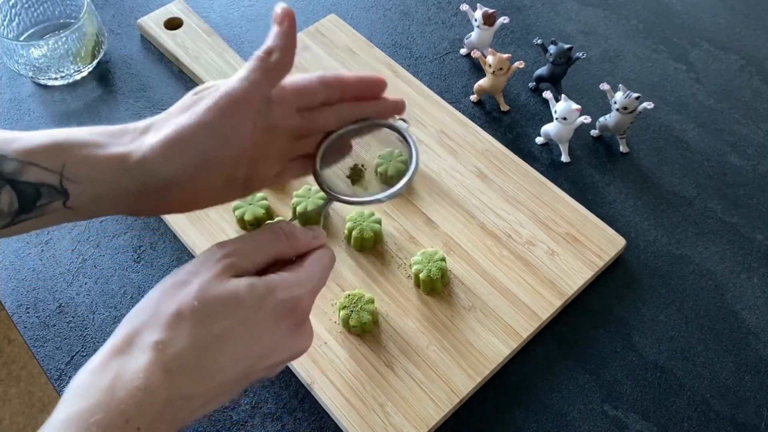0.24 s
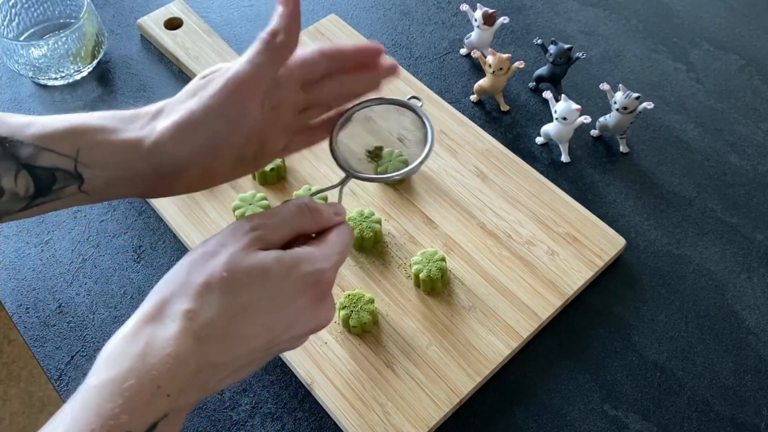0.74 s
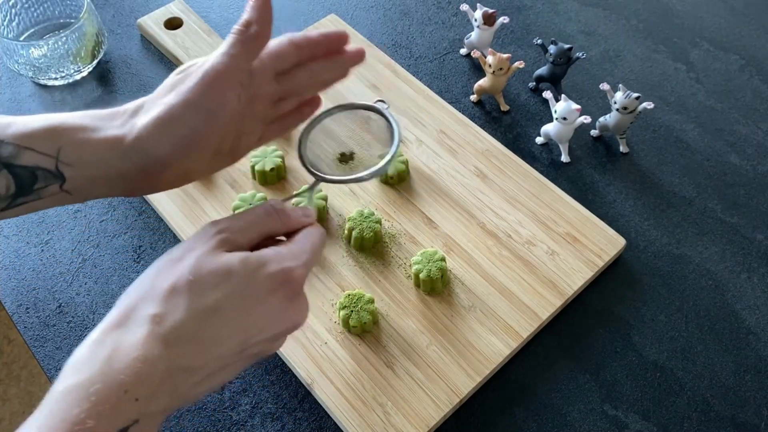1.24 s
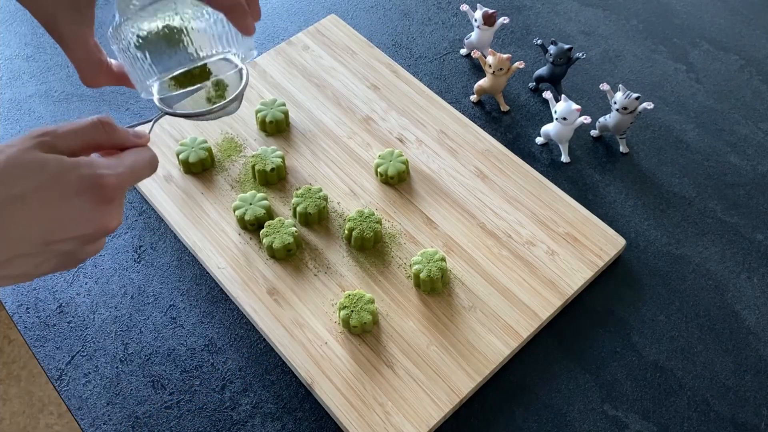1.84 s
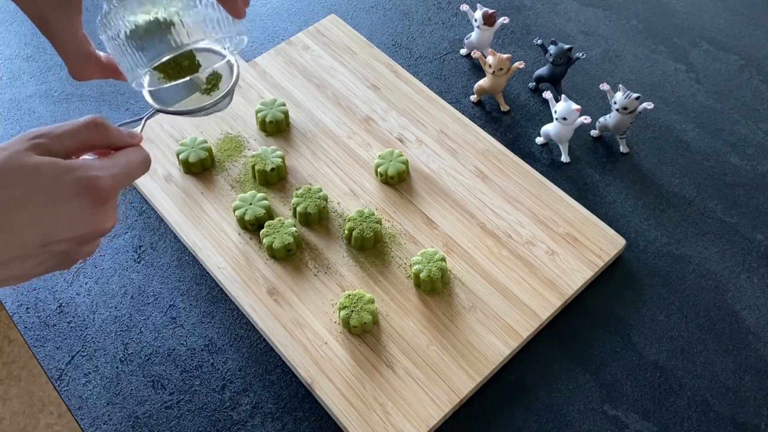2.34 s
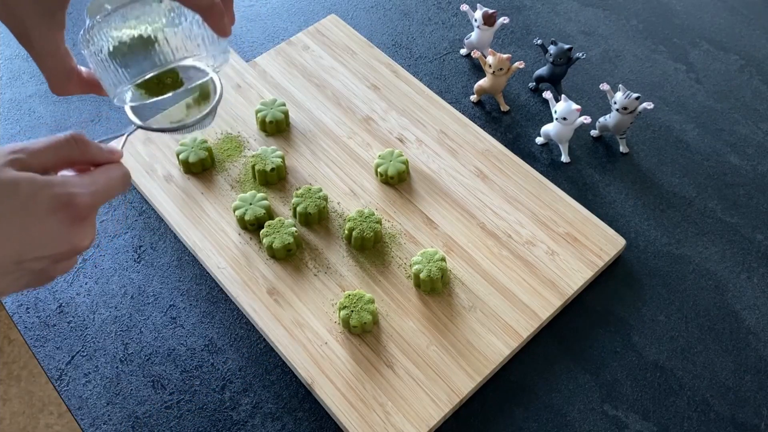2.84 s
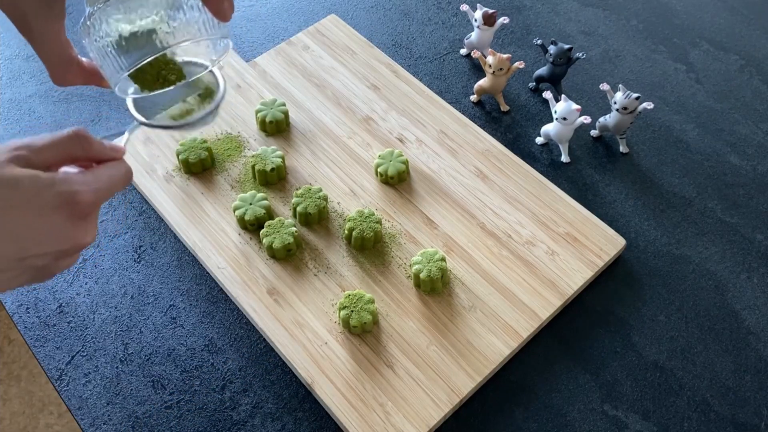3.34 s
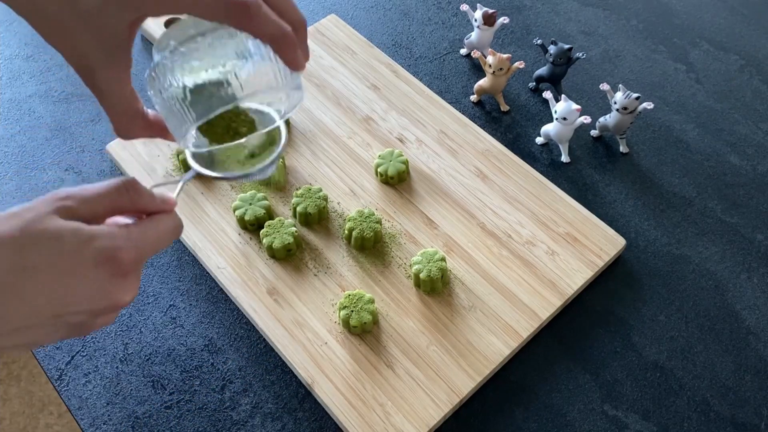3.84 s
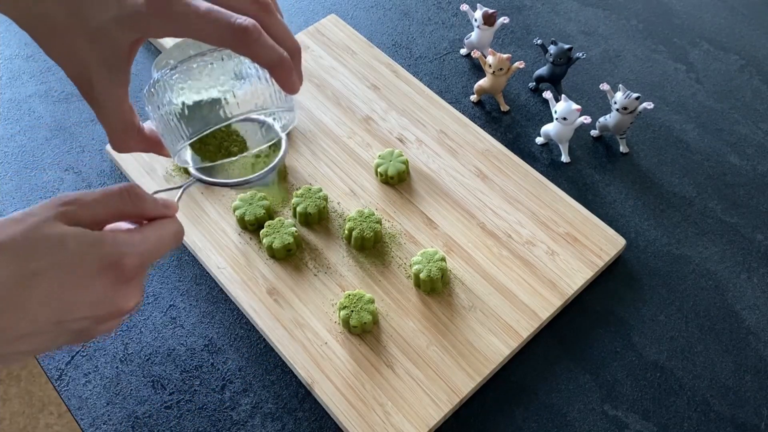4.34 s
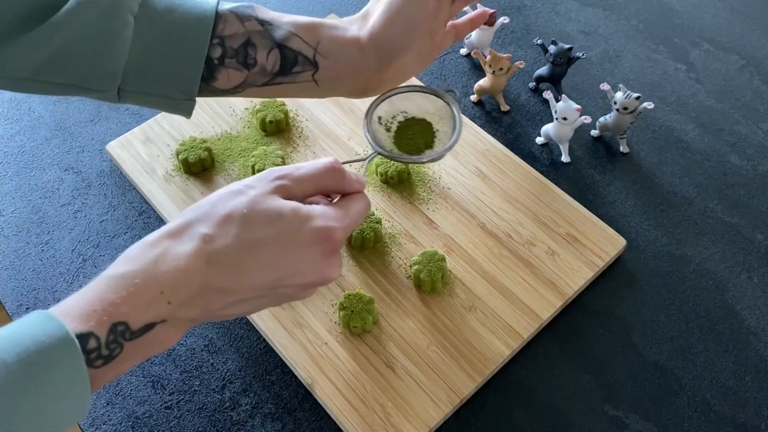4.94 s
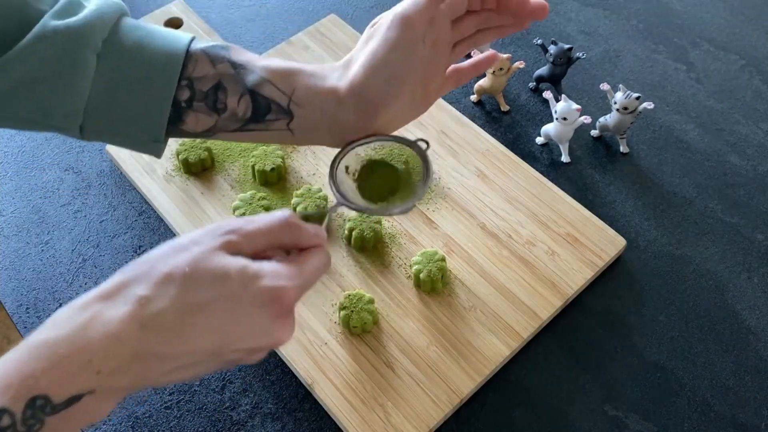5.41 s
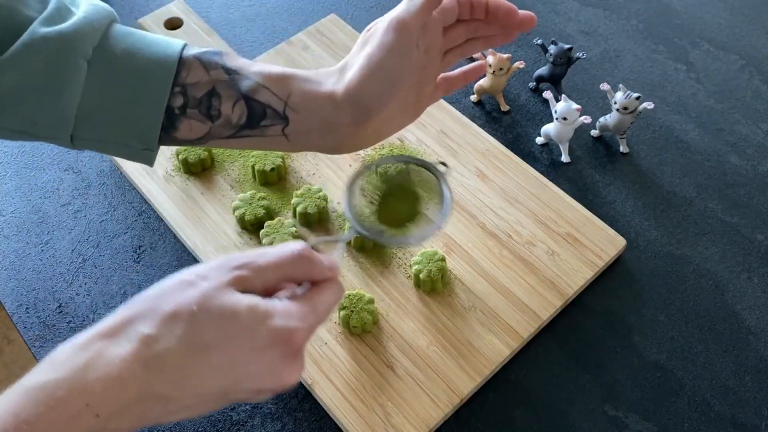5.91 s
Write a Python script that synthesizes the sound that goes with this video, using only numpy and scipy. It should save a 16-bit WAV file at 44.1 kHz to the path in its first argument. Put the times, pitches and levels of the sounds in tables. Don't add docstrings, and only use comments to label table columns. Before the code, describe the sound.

Faint gritty powder pats over a low fridge hum, then sharp metal-on-glass clinks in quick runs in a live kitchen, then abrupt quiet again.

```python
import sys
import numpy as np
from scipy import signal
from scipy.fft import rfft, irfft
from scipy.io import wavfile
from scipy.ndimage import uniform_filter1d

SR = 44100
rng = np.random.default_rng(int(sys.argv[2]) if len(sys.argv) > 2 else 0)


def invert_db(x):
    u = np.asarray(x, float) / 20
    return 10 ** u


def unload_wav(signal):
    wavfile.write(
        sys.argv[1],
        SR,
        np.round(np.clip(np.atleast_2d(signal).T, -1, 1) * 32767).astype(np.int16),
    )


N = 272097
HZ = np.arange(N // 2 + 1) * SR / N
T = np.arange(N) / SR


def level(x, db):
    return x * invert_db(db) / np.sqrt(np.mean(x ** 2))


def along(points, hz):
    f, v = np.transpose(points)
    return np.interp(np.log(hz + 1), np.log(f + 1), v)


def coloured(points):
    return irfft(rfft(rng.standard_normal(N)) * invert_db(along(points, HZ)), N)


def walk(rate):
    size = int(SR / rate)
    steps = rng.standard_normal(N)
    return level(uniform_filter1d(uniform_filter1d(steps, size), size), 0)


def add(track, sound, s):
    start = int(s * SR)
    track[start:start + len(sound)] += sound[:N - start]


def surge(s, db, rise_db_s, fall_db_s):
    return invert_db(db - np.where(T < s, rise_db_s * (s - T), fall_db_s * (T - s)))


def dips(notches):
    return np.prod([1 - .88 * np.exp(-((HZ - hz) / width_hz) ** 2) for hz, width_hz in notches], axis=0)


def ports(shared, own_left, own_right, share):
    # frequency in Hz, lead of the left port in radians.
    port_phase = [(700, 0), (1400, .2), (2800, .9), (4800, .5), (6200, 1.), (6900, 2.8), (7600, 3.6),
                  (10300, 6.3), (13400, 9.4), (14500, 10.6), (15800, 12.)]
    # Hz, width in Hz.
    mid_dips = [(7000, 800), (13600, 500)]
    side_dips = [(10300, 900)]
    share = np.clip(share, 0, 1)
    turn = np.exp(.5j * along(port_phase, HZ))
    common, own = np.sqrt(share) * rfft(shared, N), np.sqrt(1 - share)
    left = (common + own * rfft(own_left, N)) * turn
    right = (common + own * rfft(own_right, N)) / turn
    mid = (left + right) / 2 * dips(mid_dips)
    side = (left - right) / 2 * dips(side_dips)
    return np.array([mid + side, mid - side])


def street():
    # peak time in seconds, peak level in dB.
    far_thuds = [
        (.03, -74),
        (5.497, -61),
        (5.78, -67),
    ]
    dull = [(120, -27), (200, 2.5), (280, 4.5), (450, -8.5), (800, -36.5), (2000, -90.5)]  # (Hz, dB)
    band = level(coloured(dull), 0)
    rest = invert_db(-82)
    car = surge(1.44, -66, rise_db_s=19.5, fall_db_s=12)
    thuds = sum(surge(s, db, rise_db_s=900, fall_db_s=65) for s, db in far_thuds)
    return band * (rest + car + thuds)


def hum():
    # frequency in Hz, density in dB per Hz.
    hum_mid = [(12, -56.5), (20, -31), (37, -5), (118, 3), (185, -10), (232, -9.5), (291, -17.5),
               (432, -21.5), (470, -23), (825, -37), (3190, -46), (4480, -44.5), (7230, -57), (11000, -54),
               (16800, -64.5)]
    hum_side = [(12, -60), (20, -18), (45, -5), (73, -1), (232, -3.5), (541, -5.5), (589, -7),
                (2030, -28.5), (2700, -20.5), (2930, -17), (3380, -31), (7870, -30), (10400, -43.5),
                (11300, -36.5), (13400, -32), (16800, -48.5)]
    # frequency in Hz, width in Hz, level in dB.
    motor = [(109, 120, -65), (236, 15, -75.5), (493, 20, -83), (2832, 12, -99.5), (3670, 40, -99.5)]
    # peak time in seconds, peak level in dB.
    whine_surges = [
        (5.29, -86.5),
        (6.055, -86),
    ]
    whine_hz, whine_rest_db = 4441, -107
    swell = invert_db(.8 * walk(1.5))
    mid = level(coloured(hum_mid), -57.5) * swell
    side = level(coloured(hum_side), -72.5) * swell
    for hz, width_hz, db in motor:
        resonance = 1 + ((HZ - hz) / width_hz) ** 2 * 4
        tone = irfft(rfft(rng.standard_normal(N)) / resonance, N)
        mid = mid + level(tone, db) * swell
    whine = invert_db(whine_rest_db) + sum(surge(s, db, rise_db_s=80, fall_db_s=160) for s, db in whine_surges)
    mid = mid + whine * np.sin(2 * np.pi * whine_hz * T + 1.4 * walk(20))
    return np.array([mid + side, mid - side])


def powder():
    # start in seconds, peak level in dB, decay length in ms.
    pats = [
        (0.1126, -67, 22),
        (0.3244, -72, 19),
        (0.5384, -77, 25),
        (0.7424, -76, 30),
        (0.9504, -77, 28),
        (1.1664, -77, 28),
        (1.42, -74, 25),
        (1.6304, -79, 25),
        (5.4394, -79, 25),
    ]
    # frequency in Hz, level in dB.
    grain_colour = [(5000, -25), (8500, 5), (10500, 9), (12500, 10), (15500, -1), (17000, -30)]
    puffs = np.zeros(N)
    t = np.arange(SR // 8) / SR
    for s, db, length_ms in pats:
        attack = np.minimum(t / 0.0012, 1)
        add(puffs, invert_db(db) * attack * np.exp(-t * 1000 / length_ms), s)
    grit = [level(coloured(grain_colour), -5.5) * puffs for _ in range(3)]
    return irfft(ports(*grit, .7), N)


def kitchen():
    # frequency in Hz, time to fall 60 dB in seconds.
    room_t60 = [(300, 0.66), (790, 0.49), (2090, 0.51), (5510, 0.48), (14600, 0.1)]
    # frequency in Hz, level of the echoes in dB.
    room_colour = [(300, -3.5), (700, -0.5), (1200, 2.5), (2200, 4), (3200, -2), (4200, -1), (5300, -7),
                   (7500, -3), (11000, -1), (16000, -4.5)]
    room_db, early_db, early_t60_s, first_wall_s = -5, -8.5, 0.12, 0.0037
    t = np.arange(SR) / SR
    hz = np.arange(SR // 2 + 1.)
    noise = rfft(rng.standard_normal(SR)) * invert_db(along(room_colour, hz))
    out = 0
    for centre in 125 * 2. ** np.arange(8):
        band = np.clip(1 - np.abs(np.log2((hz + 1) / centre)), 0, 1)
        out = out + irfft(noise * band, SR) * 1000. ** (-t / along(room_t60, centre))
    early = 1 + invert_db(early_db) * 1000. ** (-t / early_t60_s)
    out = out * early * np.clip(t / first_wall_s - .5, 0, 1)
    return invert_db(room_db) * out / np.sqrt(np.sum(out ** 2))


def causal(power):
    cepstrum = irfft(np.log(power + 1e-12))[:len(power)]
    cepstrum[0] /= 2
    return irfft(np.exp(rfft(cepstrum, 2 * len(power) - 2)))


def contact_chatter():
    chatter_ms, chatter_db = 1.3, -1.5
    u = np.arange(512) / SR * 1000 / chatter_ms
    contacts = invert_db(chatter_db) * rng.standard_normal(size=512) * u * np.exp(-2 * u)
    contacts[int(chatter_ms * SR / 2000)] += 1
    chatter = rfft(contacts)
    return irfft(chatter / (np.abs(chatter) + 0.1 * np.abs(chatter).mean()))


def knock(flat_db):
    # frequency in Hz, level in dB, 60 dB decay in seconds.
    body = [(367, -45.5, 0.005), (730, -37, 0.024), (1145, -18, 0.012), (1325, -20, 0.012),
            (1748, -17, 0.023), (2017, -14.5, 0.012), (2470, -19, 0.021), (2627, -14, .015)]
    lower_rim = [(3092, -2, 0.009), (3377, -4.5, 0.015), (3806, -12.5, 0.0084)]
    upper_rim = [(4518, -12, 0.0056), (5275, 0.5, 0.015), (5970, -11.5, 0.012), (6580, -13, .008)]
    mesh = [(6755, -0.5, 0.0092), (7830, -7.5, 0.01), (8790, -12.5, 0.01), (9980, -7.5, 0.0042),
            (11110, -7.5, 0.0093), (11780, -1, 0.0034), (12590, -10.5, 0.013), (13730, -9, 0.0046),
            (14240, -6, 0.0062), (14640, -17.5, 0.0088), (15830, -15.5, 0.011)]
    # frequency in Hz, level in dB, 60 dB decay in seconds.
    jar = [(7920, -43, 0.18), (11060, -37.5, 0.15), (12430, -35, .2), (15000, -38, .25)]
    detune, scatter_db = .006, 1.4
    t = np.arange(8192) / SR
    modes = np.vstack([np.add(body, [0, 1.4 * flat_db, 0]),
                       np.add(lower_rim, [0, .8 * flat_db, 0]),
                       upper_rim,
                       np.add(np.vstack([mesh, jar]), [0, 2.5 + .3 * flat_db, 0])])
    chance = rng.standard_normal((2, len(modes)))
    hz = modes[:, 0] * (1 + detune * chance[0])
    db = modes[:, 1] + scatter_db * chance[1]
    sign = (-1) ** np.arange(len(modes))
    decay = 1000. ** (-t / modes[:, 2:])
    each = (sign * invert_db(db))[:, None] * np.sin(2 * np.pi * np.outer(hz, t)) * decay
    sent = causal(np.sum(np.abs(rfft(each)) ** 2, axis=0))
    heard = signal.fftconvolve(each.sum(axis=0), contact_chatter())
    peak = np.abs(heard).max()
    return heard / peak, sent / peak


def strikes():
    # start in seconds, peak in dB, how flat the rim lands in dB, share turned to the room in dB.
    knocks = [(1.8802, -14.5, -1.5, 0), (1.895, -15, 0, 0), (2.0935, -12, -1, -3.5),
              (2.0968, -8.5, -3.5, 0.5), (2.3265, -17.5, 0, -3), (2.3295, -11.5, -4.5, -2),
              (2.618, -2, -3, -2), (2.836, -8, -2.5, 0.5), (2.8445, -12.5, 1, -2.5), (3.0785, -3.5, -1, -3),
              (3.3102, -14, -0.5, 3.5), (3.3234, -10.5, 0.5, -2.5), (3.7586, -6.5, 2, -2.5),
              (3.97, -11, 2.5, 0), (3.9847, -9.5, 0, -3.5), (4.208, -1.5, -4, -3.5), (4.2149, -21, 0.5, -2),
              (4.247, -16.5, -5, -0.5), (4.2818, -19.5, -4.5, -3.5), (4.4217, -1, -4.5, -4.5),
              (4.455, -23.5, 0.5, 0.5), (4.4875, -17, -11.5, -6.5), (4.6475, -9.5, 0.5, 0),
              (4.656, -16, 1, -7), (4.7049, -15, -5.5, -7)]
    # start in seconds, peak in dB, how flat the rim lands in dB,
    # share turned to the room in dB.
    more_knocks = [
        (2.0988, -15.5, -5, -7),
        (2.3316, -16, -4, -1),
        (4.6501, -17.5, -10, -20),
        (4.6547, -11, -8, -7.5),
    ]
    unseen = (1.72, -13, -2.5, 0.3)
    direct, to_room = np.zeros(N), np.zeros(N)
    for s, db, flat_db, room_db in [unseen, *knocks, *more_knocks]:
        heard, sent = knock(flat_db)
        add(direct, heard * invert_db(db), s)
        add(to_room, sent * invert_db(db + room_db), s)
    return direct, to_room


def sieve():
    # frequency in Hz, level in dB.
    close_colour = [(300, 1.5), (1300, 3), (2600, 3), (3300, 0), (4600, 0.7), (6400, -2), (7300, -2),
                    (8200, 0.53)]
    # frequency in Hz, width in Hz, level in dB.
    room_dips = [(2680, 250, -3), (6650, 350, -6), (800, 120, -2.5)]
    # frequency in Hz, width in Hz, level in dB.
    room_rings = [(1140, 130, -4), (3150, 110, -4), (5350, 350, -9)]
    tipped_s, mouth_hz, mouth_width_hz, mouth_db = 3.9, 1775, 150, -3
    cut_in_s, cut_out_s = 1.8105, 4.8105
    direct, to_room = strikes()
    near = rng.standard_normal((2, 40)) * np.exp(-np.arange(40) / 12.)
    near /= np.sqrt(np.sum(near ** 2, axis=1, keepdims=True))
    close = rfft(direct) * invert_db(along(close_colour, HZ)) * ports(np.ones(1), near[0], near[1], .97)
    tipped = rfft(to_room * (T > tipped_s))
    mouth = invert_db(mouth_db) * tipped / (1 + 2j * (HZ - mouth_hz) / mouth_width_hz)
    thinning = invert_db(sum(db * np.exp(-((HZ - hz) / width_hz) ** 2) for hz, width_hz, db in room_dips))
    ringing = 1 + sum(invert_db(db) / (1 + 2j * (HZ - hz) / width_hz) for hz, width_hz, db in room_rings)
    room = ports(kitchen(), kitchen(), kitchen(), .41)
    far = (rfft(to_room) + mouth) * thinning * ringing * room
    shot = np.clip(np.minimum(T - cut_in_s, cut_out_s - T) / .001, 0, 1)
    return irfft(close + far, N) * shot


def scene():
    return sieve() + powder() + hum() + street()


def roll_off(x):
    return signal.sosfilt(signal.butter(12, 16990, fs=SR, output="sos"), x)


def record(dry):
    top = signal.cheby1(10, .5, 15700, fs=SR, output="sos")
    sensitivity = invert_db(np.array([[-.3], [.3]]))
    mix = signal.sosfilt(top, dry) * sensitivity
    return roll_off(mix)


dry = scene()
out = record(dry)
unload_wav(out)
```